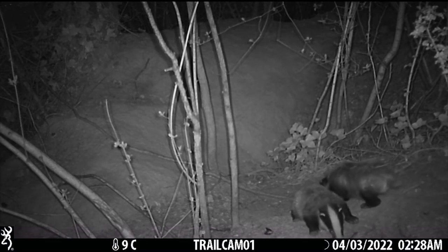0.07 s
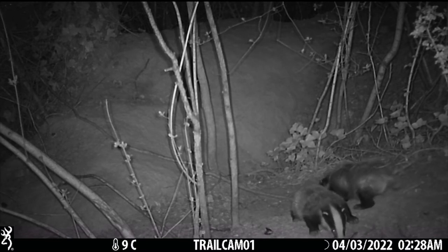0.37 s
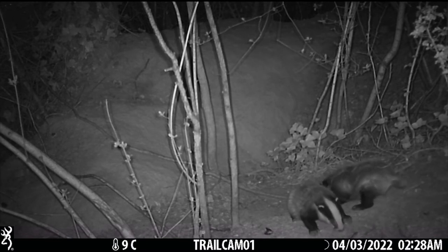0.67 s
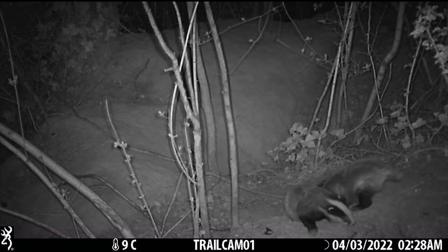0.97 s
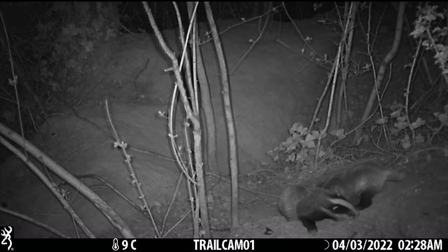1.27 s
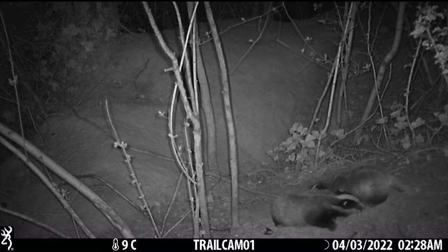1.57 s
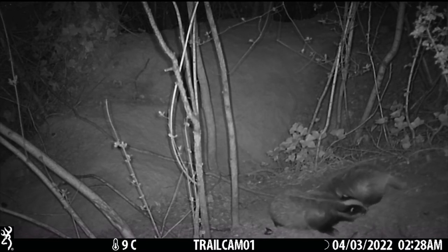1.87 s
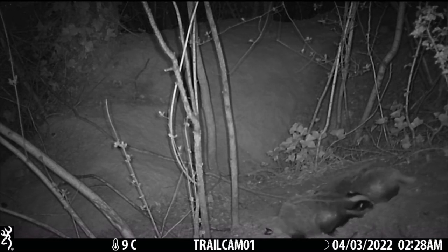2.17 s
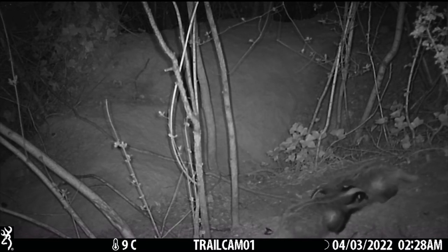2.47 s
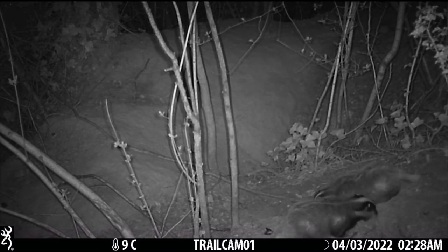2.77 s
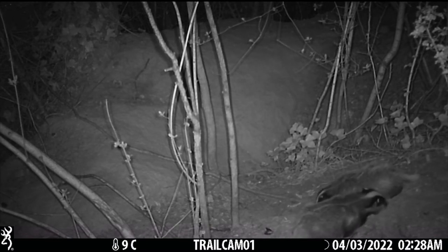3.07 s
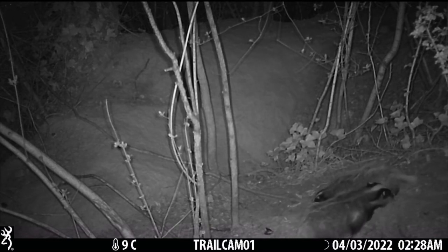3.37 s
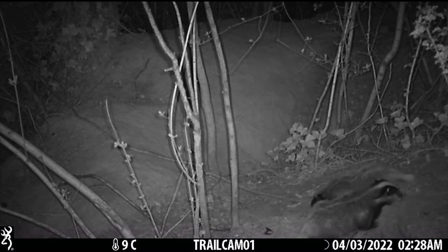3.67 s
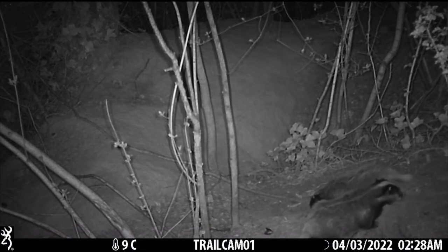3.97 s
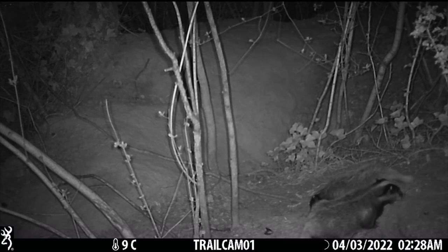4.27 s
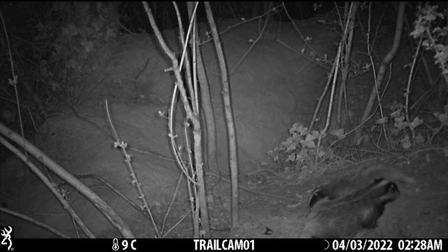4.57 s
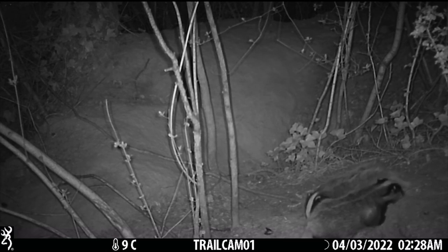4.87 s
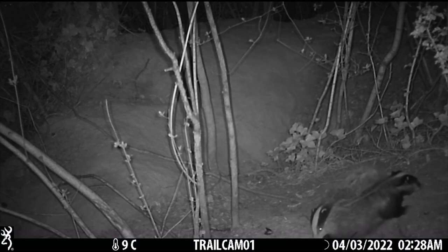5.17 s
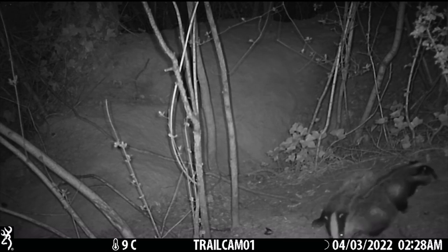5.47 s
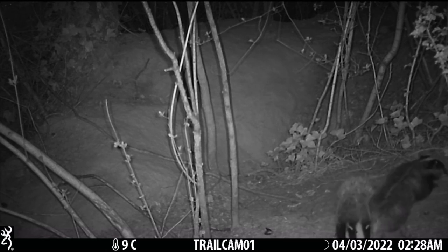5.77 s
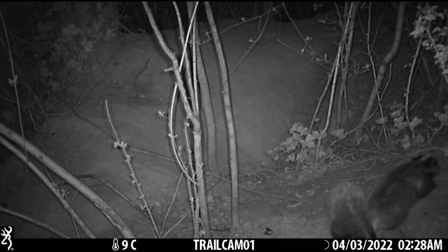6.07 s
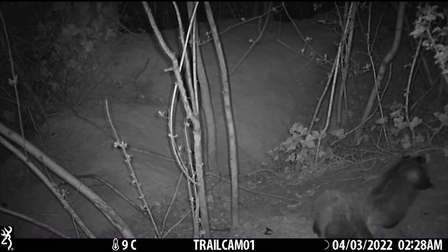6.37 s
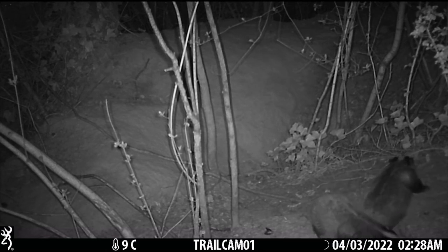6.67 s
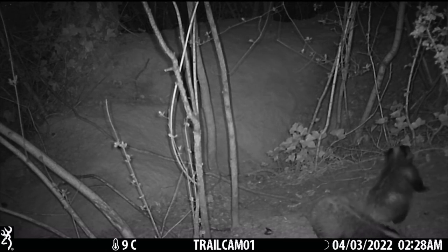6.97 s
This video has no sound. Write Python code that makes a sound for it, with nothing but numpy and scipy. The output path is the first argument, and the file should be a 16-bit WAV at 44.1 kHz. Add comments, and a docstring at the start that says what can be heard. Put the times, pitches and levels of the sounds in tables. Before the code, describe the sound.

A soft, steady microphone hiss runs through all seven seconds, with almost no bass. Over it, two badger cubs yelp as they tussle on a woodland floor. Each yelp is a very short, high, slightly raspy squeak that rises and falls, clearly louder than everything else. A faint one comes at 1 second, then a quick chattering cluster from 1.4 to 1.7 seconds, just after two tiny twig snaps. Scattered yelps follow from 2 to 3.2 seconds, strongest near 2.9. After a lull, small dry twigs tick between 4.3 and 4.6 seconds. A second run of yelps lasts from 4.6 to 5.7 seconds, and three more come between 6.6 and 7.1. Very faint scraping of fur and claws on earth lies beneath, growing slightly in the second half, with barely audible leaf rustles. The trees add a weak, short echo.

```python
"""Two badger cubs yelp as they tussle on a woodland floor at night, near a trail camera.
Each short, high yelp comes from vibrating folds in the throat: it slides to a crest and sinks away,
and a second, slower flutter can make it raspy. Fur and claws scrape the earth, twigs snap,
paws pat, and leaves and breath hiss briefly. The tree trunks scatter all this back as weak echoes.
Behind it, the camera adds a steady hiss and a faint, flickering whine."""
import sys
import numpy as np
from scipy import signal
from scipy.fft import rfft, irfft
from scipy.io import wavfile

SR = 44100
rng = np.random.default_rng(int(sys.argv[2]) if len(sys.argv) > 2 else 0)


def transcribe(signal):
    """Save signal, clipped to [-1, 1], as a 16-bit WAV file at the path in sys.argv[1]."""
    frames = np.atleast_2d(signal).T
    limited = np.clip(frames, -1, 1)
    pcm = np.round(limited * 32767).astype(np.int16)
    wavfile.write(sys.argv[1], SR, pcm)


N = 313992

REST_HZ = 657.4  # the pitch sinks towards this as the folds relax
SWELL_DB_PER_OCTAVE = 23.5  # one push drives pitch and loudness together
ACCENT_DB, ACCENT_S = 4.5, 0.0058  # the push peaks briefly at the crest
BRIGHT_DB, BRIGHT_SHARE = 2.5, 0.4  # upper overtones: lift at the crest, dB lost per dB the voice drops
SLACK_HZ, SLACK_SPAN_HZ, SLACK_ROUGH = 960, 200, 0.43  # below this pitch the folds go slack and rough
FLUTTER_HZ = 313.2  # the second, slower vibration in the voice box
WAVER_SHARE, WAVER_HZ = 0.061, 55  # pitch wobble at full roughness: how much, how fast
SHIMMER_DB, SHIMMER_HZ = 13, 110  # flicker of each harmonic at full roughness: how much, how fast
ATTACK_S, SLACK_ATTACK_S, RELEASE_S = 0.0042, 0.0062, 0.0088  # fade in, extra when slack, fade out

# How the throat and mouth boost or weaken each frequency. Columns: frequency_hz, gain_db
THROAT = [(400, -40.5), (600, -24.5), (800, -19), (1000, -2), (1200, 3.5), (1550, 6), (2000, 1.5),
          (2400, 6), (2700, 0), (3100, -2.5), (3500, -16), (3900, -13), (4200, -25), (8200, -47)]
# One yelp a row. Columns: start_s, rise_s, fall_s, sink_s (how slowly the pitch drops),
# bend (1 is a straight slide, more flattens early), start_hz, crest_hz, crest_db,
# press_db (boosts harmonic 2, and 4 and 5 half as much), twang_db (boosts harmonic 3), roughness (0-1)
YELPS = [(1.005, 0.0023, 0.028, 0.018, 0.91, 847, 975, -41, -24, -27, 0.09),
         (1.377, 0.0026, 0.065, 0.02, 1.2, 1190, 1126, -31.5, 7.5, 6.5, 0.05),
         (1.429, 0.023, 0.021, 0.027, 1.83, 719, 1128, -28, 4.5, 7, 0.13),
         (1.462, 0.0097, 0.04, 0.02, 2.32, 724, 1281, -19.5, 3, 4, 0.1),
         (1.526, 0.021, 0.023, 0.087, 1.6, 637, 1255, -22, 3.5, -7.5, 0.1),
         (1.557, 0.013, 0.025, 0.015, 1.3, 1217, 1318, -19.5, 6, -2, 0.01),
         (1.682, 0.008, 0.025, 0.015, 1, 1187, 1202, -24.0, 0, 3, 0.1),
         (2.011, 0.0088, 0.038, 0.019, 1.2, 1120, 1083, -30.5, -3, -9, 0.08),
         (2.223, 0.0082, 0.044, 0.012, 1, 1190, 1164, -27, 2, 4, 0.17),
         (2.457, 0.0033, 0.086, 0.03, 1.2, 1370, 1187, -28, -2, 3, 0.21),
         (2.51, 0.043, 0.038, 0.017, 0.97, 706, 1080, -31.5, -2, -5, 0.13),
         (2.824, 0.0051, 0.034, 0.016, 2.5, 1235, 1171, -22.5, 4, -6.5, 0.1),
         (2.894, 0.024, 0.0025, 0.006, 1, 923, 1050, -30.5, 0, 4.5, 0.14),
         (2.918, 0.0091, 0.027, 0.016, 3.4, 1000, 1262, -19.5, 6.5, 1.5, 0.15),
         (3.158, 0.0064, 0.012, 0.017, 0.87, 1124, 1042, -32.5, -2.5, 1.5, 0.09),
         (4.643, 0.0061, 0.014, 0.015, 1, 1097, 1196, -21.5, 2, -4, 0.06),
         (4.725, 0.027, 0.018, 0.0085, 0.93, 1005, 1206, -21.5, 3.5, -4.5, 0.09),
         (4.805, 0.047, 0.029, 0.0061, 1.5, 714, 1177, -22, 5.5, 4.5, 0.13),
         (4.901, 0.045, 0.021, 0.0088, 2.07, 698, 1091, -25.5, 6, 3.0, 0.18),
         (5.165, 0.012, 0.019, 0.026, 0.8, 1143, 1178, -20.5, 1.5, 1, 0.07),
         (5.237, 0.036, 0.02, 0.028, 2, 580, 1176, -21.5, -1.0, -0.5, 0.11),
         (5.468, 0.0091, 0.024, 0.03, 3.1, 1100, 1226, -20, -5.5, -10.5, 0.05),
         (5.712, 0.0098, 0.03, 0.044, 0.61, 975, 1152, -28.5, -2.5, -7, 0.05),
         (6.632, 0.0063, 0.012, 0.014, 1.3, 913, 1052, -31, -15, -9.5, 0.04),
         (6.981, 0.016, 0.022, 0.027, 1, 848, 1141, -31.5, -2, -8, 0.02),
         (7.106, 0.014, 0.0066, 0.015, 0.99, 582.4, 1400, -22, -5.5, -16, 0.2)]


def yelp(start_s, rise_s, fall_s, sink_s, bend, start_hz, crest_hz, crest_db, press_db, twang_db,
         roughness, slope_db=12, top_db=-3):
    """Vibrating folds make a high voice, the throat shapes it, and a slower flutter makes it rasp."""
    t = np.arange(0, rise_s + fall_s, 1 / SR)
    # the pitch slides to its crest, then sinks towards rest, and the loudness goes with it
    swoop_hz = crest_hz + (start_hz - crest_hz) * np.clip(1 - t / rise_s, 0, 1) ** bend
    sinking_hz = REST_HZ + (crest_hz - REST_HZ) * np.exp(-((t - rise_s) / sink_s) ** 2)
    pitch_hz = np.where(t < rise_s, swoop_hz, sinking_hz)
    accent_db = ACCENT_DB * (np.exp(-abs(t - rise_s) / ACCENT_S) - 1)
    level_db = crest_db + SWELL_DB_PER_OCTAVE * np.log2(pitch_hz / crest_hz) + accent_db
    # the folds turn unsteady as they go slack at low pitch
    slack = np.clip((SLACK_HZ - pitch_hz) / SLACK_SPAN_HZ, 0, 1)
    unsteady = roughness + SLACK_ROUGH * slack
    waver = WAVER_SHARE * roughness * band(len(t), 0, width_hz=WAVER_HZ)
    jitter = 0.06 * unsteady * band(len(t), 0, width_hz=400)
    pitch_hz = pitch_hz * (1 + waver) * (1 + jitter)
    flutter_hz = FLUTTER_HZ * (1 + 0.12 * band(len(t), 0, width_hz=120))
    # harmonics are whole multiples of the pitch; the flutter adds two tones on either side of each
    harmonic = np.arange(1, 6)[:, None, None]
    side = np.arange(-2, 3)[:, None]
    tone_hz = harmonic * pitch_hz + side * flutter_hz
    folds_db = -slope_db * np.log10(harmonic) + press_db * (harmonic == 2) + twang_db * (harmonic == 3)
    folds_db += (top_db + press_db / 2) * (harmonic > 3)
    bright_db = (harmonic > 2) * (BRIGHT_DB + BRIGHT_SHARE * (level_db - crest_db))
    strength = amp(folds_db + bright_db + look_up(THROAT, abs(tone_hz)))
    strength *= (roughness / harmonic) ** abs(side)  # a rougher voice has louder side tones
    shimmer = np.array([[band(len(t), 0, width_hz=SHIMMER_HZ)] for _ in harmonic])
    strength *= amp(SHIMMER_DB * unsteady * shimmer)
    strength /= np.sqrt((strength ** 2).sum((0, 1)) / 2)  # keep the total power steady
    phase = 2 * np.pi * np.cumsum(tone_hz, axis=-1) / SR
    voice = -(strength * np.cos(phase)).sum((0, 1))
    voice += 0.55 * unsteady * noise(len(t), THROAT)
    # tight folds start at once, slack ones swell in
    attack_s = ATTACK_S + SLACK_ATTACK_S * slack[0]
    fade = np.clip(t / attack_s, 0, 1) * np.clip((t[-1] - t) / RELEASE_S, 0, 1)
    return start_s, amp(level_db) * np.sin(np.pi / 2 * fade) ** 2 * voice


# How loud the scraping is as the tussle goes on. Columns: time_s, level_db
SCUFFLE = [(0, -70), (.9, -64), (1.3, -70), (1.9, -68.5), (2.999, -62.5), (3.7, -80), (4.2, -61),
           (4.599, -61), (5.6, -57), (6.1, -61.5), (6.6, -59), (7.1, -58.5)]


def scuffle(grain_db=-0.5):
    """Fur and claws scrape softly on bare earth as the two cubs roll about."""
    scrape = band(N, centre_hz=1450, width_hz=428)
    grit = unit(scrape * amp(grain_db * band(N, 0, width_hz=110)))
    time_s, level_db = np.transpose(SCUFFLE)
    return grit * amp(np.interp(np.arange(N) / SR, time_s, level_db))


# Twigs and dry stems underfoot. Columns: start_s, level_db (before trim_db is added), centre_hz
TWIG_SNAPS = [(1.3432, -37.5, 2530), (1.362, -39, 2200), (4.3062, -35, 2060), (4.401, -41, 2300),
              (4.497, -40.5, 2300), (4.545, -43.5, 2720), (4.5945, -39, 2020), (4.632, -38, 2320)]


def twig_snap(start_s, level_db, centre_hz, rise_s=0.0017, trim_db=-8):
    """A twig snaps with a tiny, dry burst of noise."""
    age = np.arange(2000) / SR / rise_s  # 1 at the loudest moment
    burst = age * np.exp(1 - age) * band(len(age), centre_hz, width_hz=520)
    return start_s, amp(level_db + trim_db) * burst


# Soft, low thuds: paw pats, and the low tail of the first yelp. Columns: peak_s, level_db
SOFT_THUDS = [(1.018, -65), (1.175, -66), (2.5, -64), (5.235, -66), (6.005, -70)]


def soft_thud(peak_s, level_db, rise_s=0.0098):
    """Low noise swells quickly and dies away: a paw on soft earth, or the tail of a yelp."""
    age = np.arange(4000) / SR / rise_s
    thud = age * np.exp(1 - age) * band(len(age), centre_hz=564, width_hz=165)
    return peak_s - rise_s, amp(level_db) * thud


# The crisp tone of the short hisses. Columns: frequency_hz, gain_db
CRISP_TONE = [(500, -21.5), (1500, -24), (3000, -5), (5000, 12.5), (8500, 14), (11000, -6.5),
              (16000, -24.5)]
# Short, high hisses: rustling leaves, and breath with the raspy yelps.
# Columns: start_s, length_s, level_db
SHORT_HISSES = [(0.666, 0.098, -75), (0.883, 0.038, -67), (1.155, 0.057, -77), (1.458, 0.31, -72.5),
                (2.44, 0.13, -74), (2.895, 0.081, -71), (3.128, 0.068, -75), (3.716, .04, -74),
                (4.722, 0.077, -75.5), (4.824, 0.055, -68.5), (4.914, 0.056, -69), (5.15, 0.04, -70),
                (5.25, 0.056, -68), (5.418, 0.017, -64), (5.798, 0.083, -68.5), (6.346, 0.12, -74.5)]


def short_hiss(start_s, length_s, level_db, grain_db=4):
    """Sliding leaves or a puff of breath make high, grainy noise that fades in and out."""
    size = round(length_s * SR)
    grains = unit(noise(size, CRISP_TONE) * amp(grain_db * band(size, 0, width_hz=600)))
    return start_s, amp(level_db) * grains * signal.windows.tukey(size, 0.6)


# How long the echoes take to fade by 60 dB. Columns: frequency_hz, fade_s
ECHO_FADE = [(500, 0.1), (1200, 0.24), (2500, 0.2), (8000, 0.075)]


def woodland_echoes(sound, wet_db=-14.0, first_s=0.004, near_db=5, near_s=0.013, db_per_octave=3):
    """Trunks and an earth bank scatter back many weak echoes, strongest when near and high-pitched."""
    size = SR // 2
    delay_s = np.arange(size) / SR
    signs = rng.choice([-1, 1], size)
    arrives = (rng.random(size) < 1500 / SR) & (delay_s > first_s)  # about 1500 echoes a second
    echoes = signs * arrives * amp(near_db * np.exp(-delay_s / near_s))
    # split the echoes by frequency so that each part fades at its own speed
    hz, t, parts = signal.stft(echoes, SR, nperseg=256)
    bright_db = db_per_octave * np.log2(np.clip(hz, 800, 4000) / 1600)
    fade_db = -60 * t / look_up(ECHO_FADE, hz)[:, None]
    _, tail = signal.istft(parts * amp(bright_db[:, None] + fade_db), SR, nperseg=256)
    return amp(wet_db) * signal.fftconvolve(sound, tail / np.linalg.norm(tail))[:N]


# The tone of the microphone's hiss. Columns: frequency_hz, gain_db
HISS_TONE = [(40, -55.5), (120, -43), (240, -37.5), (350, -26.5), (500, -17), (750, -9.5), (1050, -1),
             (1550, 0.5), (2400, -3.5), (3500, -9.5), (5000, -18), (7000, -23.5), (11800, -27.5),
             (15500, -32)]
# Two close electronic tones. Columns: pitch_hz, level_db (the middle of the flicker)
WHINE = [(11209, -91.5), (11237, -91.5)]


def camera_noise(hiss_db=-56.5, flicker_db=5):
    """The microphone hisses steadily and the electronics add a thin, flickering whine."""
    t = np.arange(N) / SR
    hiss = amp(hiss_db) * noise(N, HISS_TONE)
    whine = sum(amp(db) * np.sqrt(2) * np.sin(2 * np.pi * hz * t) for hz, db in WHINE)
    flicker = amp(flicker_db * np.tanh(band(N, 0, width_hz=26)))
    return hiss + whine * flicker


def amp(db):
    """Turns decibels into a number to multiply a sound by."""
    return 10 ** (np.asarray(db) / 20)


def unit(sound):
    """Scales a sound to an average strength (rms) of 1."""
    return sound / np.sqrt(np.mean(sound ** 2) + 1e-20)


def look_up(table, hz):
    """Reads between a table's rows, with frequencies spaced by octaves."""
    row_hz, values = np.transpose(table)
    return np.interp(np.log(hz + 1), np.log(row_hz), values)


def noise(size, tone):
    """Noise of strength 1, shaped by a table of frequencies and gains."""
    hz = np.fft.rfftfreq(size, 1 / SR)
    return unit(irfft(rfft(rng.standard_normal(size)) * amp(look_up(tone, hz)), size))


def band(size, centre_hz, width_hz):
    """Noise of strength 1 around one frequency; around zero it is a random wobble."""
    white = rng.standard_normal(size + 4096)
    hz = np.fft.rfftfreq(len(white), 1 / SR)
    bell_curve = np.exp(-0.5 * ((hz - centre_hz) / width_hz) ** 2)
    return unit(irfft(rfft(white) * bell_curve)[:size])


def add(mix, start_s, sound):
    """Mixes a sound in at its start time."""
    part = mix[round(start_s * SR):][:len(sound)]
    part += sound[:len(part)]


def scene():
    """The cubs yelp and scuffle, and the trees echo them."""
    cubs = scuffle()
    sources = (yelp, YELPS), (twig_snap, TWIG_SNAPS), (soft_thud, SOFT_THUDS), (short_hiss, SHORT_HISSES)
    for source, table in sources:
        for row in table:
            add(cubs, *source(*row))
    return (cubs + woodland_echoes(cubs))[None]


def record(dry, low_hz=380, high_hz=15750):
    """The small microphone loses the bass; the camera adds its noise and cuts the highest treble."""
    bass_cut = signal.butter(3, low_hz, "highpass", fs=SR, output="sos")
    treble_cut = signal.firwin(511, high_hz, window=("kaiser", 9), fs=SR)
    heard = signal.sosfilt(bass_cut, dry) + camera_noise()
    return signal.oaconvolve(heard, treble_cut[None], "same")


dry = scene()
out = record(dry)
transcribe(out)
```